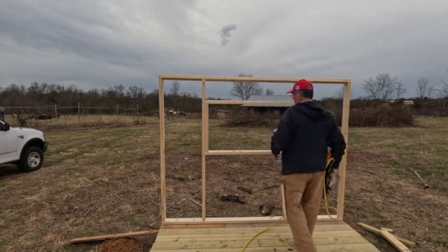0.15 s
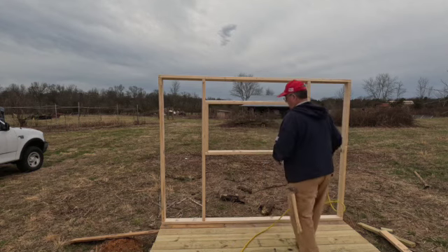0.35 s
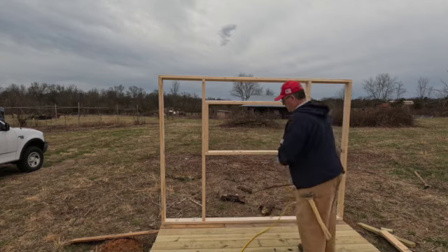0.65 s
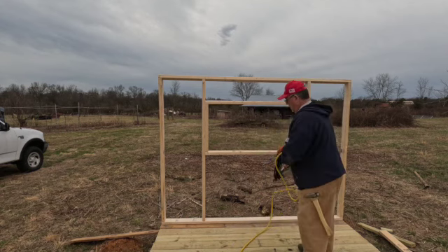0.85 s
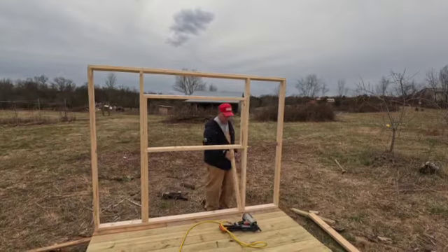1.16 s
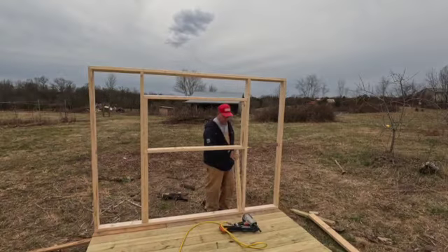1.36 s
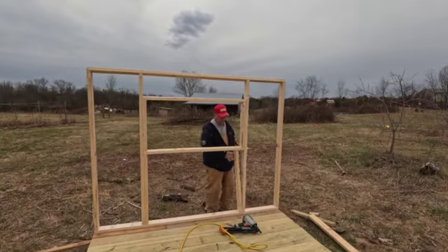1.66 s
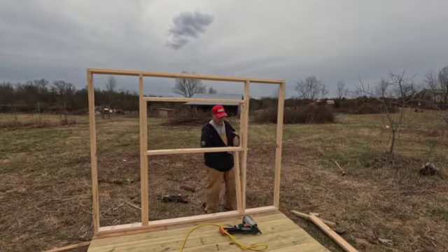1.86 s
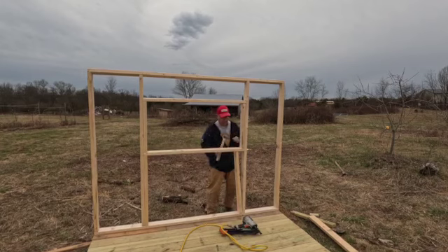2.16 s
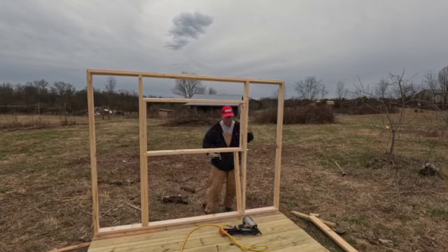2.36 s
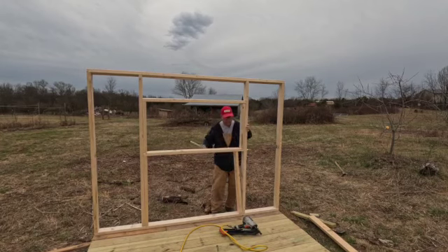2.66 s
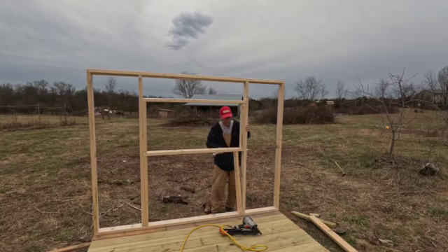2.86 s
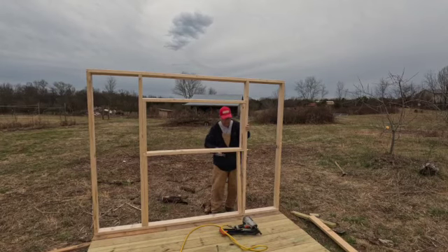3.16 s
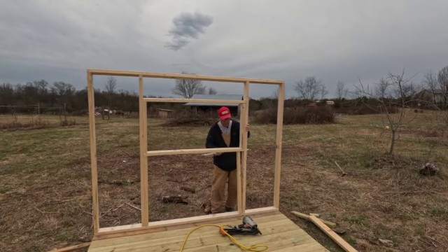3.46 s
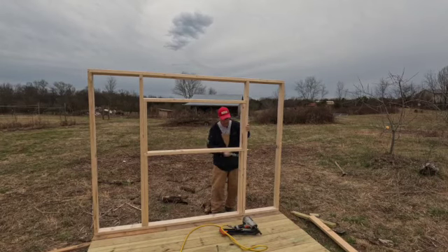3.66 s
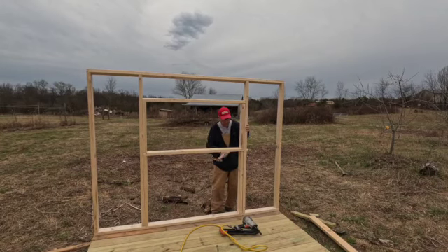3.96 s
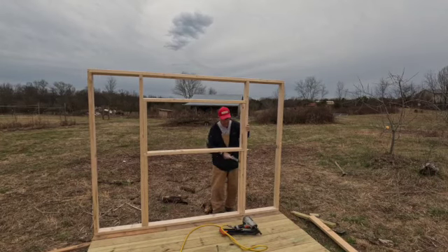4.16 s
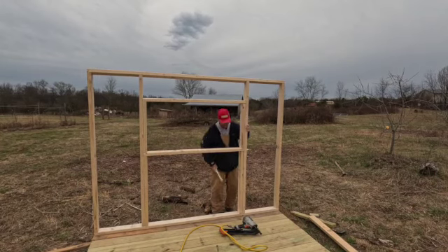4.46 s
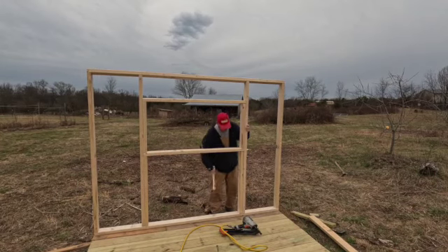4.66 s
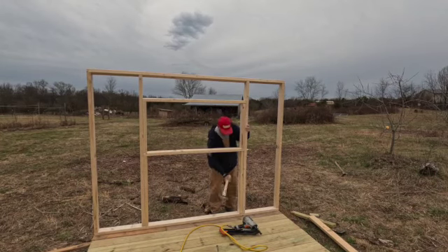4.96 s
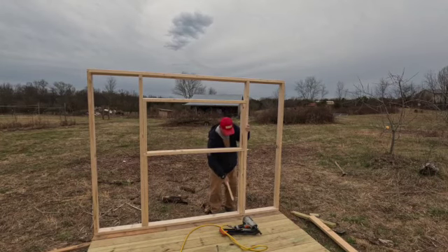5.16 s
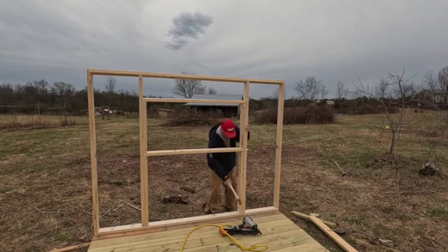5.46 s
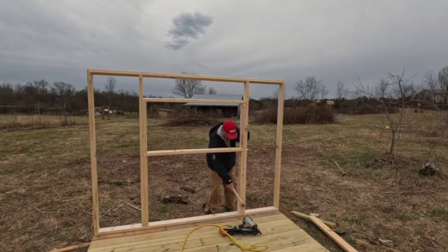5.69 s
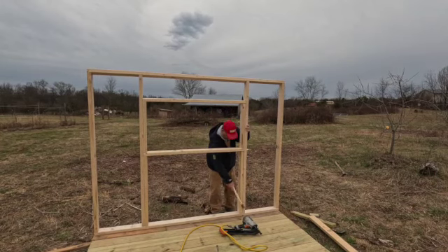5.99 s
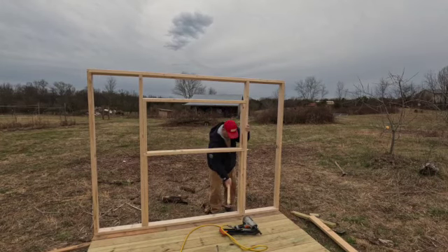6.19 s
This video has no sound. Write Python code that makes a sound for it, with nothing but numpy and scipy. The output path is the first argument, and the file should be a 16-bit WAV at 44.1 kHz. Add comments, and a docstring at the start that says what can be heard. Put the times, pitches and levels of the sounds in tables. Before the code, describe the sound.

A loud air compressor roars close by and cuts off abruptly, then quiet field wind, light wooden knocks and five hard hammer blows with outdoor echoes.

```python
"""A building site in an open field. A compressor (coloured noise, fuzzy lines, throbbing tone) roars
close by and is cut off. After a short near-silence the field fades in: low wind, far wash, hum and
rustling clothes, all shaped noise. Light knocks follow (noise taps, frame modes), before and among five
hard blows on a timber frame (noise cracks, ringing modes), each thrown back by a wall some 16 m away
and by the far tree line."""
import sys
import numpy as np
from scipy import signal
from scipy.io import wavfile
from scipy.ndimage import uniform_filter1d

SR = 44100
rng = np.random.default_rng(int(sys.argv[2]) if len(sys.argv) > 2 else 0)


def put_to_file(sound):
    """Save the sound as 16-bit audio at rate SR, in the file named by the first command-line argument."""
    columns = np.atleast_2d(sound).T  # one column per channel
    safe = np.clip(columns, -1, 1)
    whole_steps = np.round(safe * 32767)
    wavfile.write(sys.argv[1], SR, whole_steps.astype(np.int16))


N = 279153


def amp(db):
    """dB to amplitude factor."""
    return 10 ** (np.asarray(db) / 20)


def evened(x):
    """Scale to unit RMS."""
    return x / np.sqrt(np.mean(x ** 2) + 1e-20)


def read(points, hz):
    """Interpolate a (f, value) curve on a log frequency axis."""
    f, value = np.transpose(points)
    return np.interp(np.log(hz + 1), np.log(f + 1), value)


def curves(rows):
    """Interpolate each column of a (t, ...) table to sample rate."""
    s, *columns = np.transpose(rows)
    return [np.interp(np.arange(N) / SR, s, c) for c in columns]


def add(mix, s, sound):
    """Mix a sound in from time s, cut at the end of the mix."""
    part = mix[round(s * SR):][:len(sound)]
    part += sound[:len(part)]


def lumps(count, size, depth_db):
    """Gain that wanders at random, holding for about size samples."""
    wander = rng.standard_normal(count)
    for _ in range(2):
        wander = uniform_filter1d(wander, size=size)
    return amp(depth_db * evened(wander))


def noise(shape, patchy_db, flicker_db):
    """Unit-RMS noise: random short-time spectra, drifting patches, a flicker shared by all bins."""
    frames, hz = N // 256 + 5, np.fft.rfftfreq(1024, 1 / SR)
    real, imag, patches = rng.standard_normal((frames, 513, 3)).T
    patches = uniform_filter1d(patches, size=8, axis=0)  # across bins
    patches = evened(uniform_filter1d(patches, size=10, axis=1))  # across frames
    flicker = evened(uniform_filter1d(rng.standard_normal(frames), size=4))
    gain_db = read(shape, hz)[:, None] + patchy_db * patches + flicker_db * flicker
    spectra = (real + 1j * imag) * amp(gain_db)
    return evened(signal.istft(spectra, nperseg=1024, noverlap=768)[1][:N])


def whistle(hz, width_hz):
    """Fuzzy line: noise through a narrow double-pole resonance, shifted to hz, unit RMS."""
    r = np.exp(-np.pi * width_hz / SR)
    white = rng.standard_normal(N) + 1j * rng.standard_normal(N)
    slow = signal.lfilter([1], [1, -2 * r, r * r], white)
    return evened((slow * np.exp(2j * np.pi * hz * np.arange(N) / SR)).real)


def causal(db):
    """Minimum-phase impulse response with the given dB on 2049 bins, faded out."""
    mirrored = np.r_[db, db[-2:0:-1]]
    log_gain = np.log(amp(np.maximum(mirrored, -100)))
    response = np.fft.ifft(np.exp(np.conj(signal.hilbert(log_gain)))).real
    return response[:2048] * np.hanning(4096)[2048:]


def ring(modes, t, pitch, spread_db, rise_s, tilt_db=0):
    """Modes of a struck body, peak 1; each blow lands elsewhere, so mode strengths vary."""
    hz, db, t60 = np.transpose(modes)[:, :, None]
    db = db + spread_db * rng.standard_normal(db.shape) + tilt_db * np.log2(hz)
    partials = amp(db - 60 * t / t60) * np.sin(2 * np.pi * hz * pitch * t)
    wave = partials.sum(0) * (1 - np.exp(-t / rise_s))
    return wave / abs(wave).max()


def burst(t, t60, colour, rise_s):
    """Dying puff of noise through a colour, peak 4 ms RMS = 1."""
    puff = rng.standard_normal(len(t)) * amp(-60 * t / t60) * (1 - np.exp(-t / rise_s))
    wave = signal.oaconvolve(puff, colour)[:len(t)]
    return wave / np.sqrt(uniform_filter1d(wave ** 2, size=176).max())


def microphone_noise(level_db=-101):
    """Steady white noise floor."""
    return amp(level_db) * rng.standard_normal(N)


# breeze and cloth: t/s, breeze level/dB, rustle level/dB
FIELD_LEVELS = [(1.06, -54.5, -66), (1.2, -51.5, -64), (1.33, -50, -63), (1.7, -50.5, -62),
                (2.05, -47.5, -63.5), (2.35, -49.5, -61), (2.57, -48.5, -55), (2.9, -47.5, -61.5),
                (3.2, -55, -64), (3.8, -58, -68), (4.05, -57, -72.5), (4.3, -58.5, -59.5),
                (4.55, -60.5, -66.5), (4.75, -57.5, -66), (5.3, -57.5, -65), (5.7, -59, -71),
                (6.33, -55, -70)]
# spectra of low wind, far wash, cloth rustle: f/Hz, relative density/dB
WIND_SPECTRUM = [(15, -58), (25, -19.5), (91, -1.5), (118, 2.5), (194, -5), (253, -1.5), (317, -15.5),
                 (454, -25), (600, -29.5), (780, -52), (1320, -120)]
WASH_SPECTRUM = [(180, -25), (300, 1), (503, -4.5), (613, 0), (897, -8.5), (1150, -7), (1670, -17),
                 (2000, -22.5), (2600, -47.5), (4400, -120)]
RUSTLE_SPECTRUM = [(710, -33.5), (1200, -2), (2560, -4), (2770, -4.5), (4850, -16.5), (5680, -16.5),
                   (7150, -24), (8990, -37), (10500, -31), (13000, -43.5)]
RETURN_S, RETURN_RISE_S = 1.041, 0.051
STILL_DB = -57  # calm breeze, reference for wash and hum
WASH_DB, WASH_DB_PER_DB = -63, 0.75  # level in calm air, gain per dB of breeze
HUM_DB, HUM_DB_PER_DB = -71.5, 2
HUM_HZ, HUM_POLE_WIDTH_HZ, HUM_WAVER_DB = 121, 12, 4.0


def field():
    """Lumpy wind, far wash and hum carried by the breeze, grainy cloth rustle; all fade in."""
    breeze_db, rustle_db = curves(FIELD_LEVELS)
    rise_db = breeze_db - STILL_DB
    wind = amp(breeze_db) * noise(WIND_SPECTRUM, patchy_db=2.8, flicker_db=1.5)
    wash = amp(WASH_DB + WASH_DB_PER_DB * rise_db) * noise(WASH_SPECTRUM, patchy_db=1.5, flicker_db=1.2)
    rustle = amp(rustle_db) * noise(RUSTLE_SPECTRUM, patchy_db=1.6, flicker_db=1.3)
    hum = whistle(HUM_HZ, HUM_POLE_WIDTH_HZ) * lumps(N, size=3000, depth_db=HUM_WAVER_DB)
    hum = amp(HUM_DB + HUM_DB_PER_DB * rise_db) * hum
    fade_in = np.clip((np.arange(N) / SR - RETURN_S) / RETURN_RISE_S, 0, 1) ** 2
    return (wind + wash + rustle + hum) * fade_in


# spectra of rumble and air hiss: f/Hz, relative density/dB
RUMBLE_SPECTRUM = [(15, -46), (25, -39.5), (69, 4.5), (144, -2.5), (172, -10.5), (312, 2.5), (546, -10.5),
                   (687, -13), (1030, -20.5), (1180, -16.5), (1400, -24), (1570, -26.5), (2500, -30),
                   (3250, -54.5), (5500, -120)]
HISS_SPECTRUM = [(880, -22), (1500, -8), (1590, -4.5), (1690, -5), (2370, -5), (4080, -11), (7420, -33.5),
                 (8940, -46), (10100, -40.5), (14000, -76.5)]
# motor lines: f/Hz, pole width/Hz, level re rumble noise/dB
MOTOR_LINES = [(72, 11, -10), (141.4, 4.2, -12.5), (717, 14, -20.5), (792, 21, -19), (1570, 27, -26)]
CUT_S, CUT_T60_S = 0.96, 0.022
RUMBLE_DB, RUMBLE_CLIMB_DB_PER_S = -28.5, 2.5  # level at t = 0; the load grows
HISS_DB, HISS_CLIMB_DB_PER_S = -47.5, 4
PIP_HZ, PIP_DB, PIP_DIP_DB = 1172, -41, -15.5  # RMS level at throb crest, change in the dip
PIP_FIRST_S, PIP_EVERY_S = 0.18, 0.176


def compressor():
    """Rumble with fuzzy motor lines, air hiss and a throbbing thin tone, cut off sharply."""
    t = np.arange(N) / SR
    running = np.minimum(t, CUT_S)
    rumble = noise(RUMBLE_SPECTRUM, patchy_db=1.0, flicker_db=0.83)
    rumble = rumble + sum(amp(db) * whistle(hz, width) for hz, width, db in MOTOR_LINES)
    roar = amp(RUMBLE_DB + RUMBLE_CLIMB_DB_PER_S * running) * rumble
    hiss = noise(HISS_SPECTRUM, patchy_db=1.16, flicker_db=0.56)
    hiss = amp(HISS_DB + HISS_CLIMB_DB_PER_S * running) * hiss
    throb = abs(np.sin(np.pi * (t - PIP_FIRST_S) / PIP_EVERY_S))
    pip = amp(PIP_DB + PIP_DIP_DB * throb) * np.sqrt(2) * np.sin(2 * np.pi * PIP_HZ * t)
    after = np.maximum(t - CUT_S, 0)
    dying = amp(-60 * after / CUT_T60_S) + amp(-44.5 - 60 * after / 0.09)  # fast drop, faint tail
    return (roar + hiss + pip) * dying


# low modes of the timber frame: f/Hz before pitch factor, level before tilt/dB, t60/s
THUD_MODES = [(103.8, -21.5, 0.079), (181.3, -1.5, 0.15), (209.9, 3, 0.12), (266.8, 5, 0.077),
              (307.6, 0, 0.1), (450, -11.5, 0.024)]


def frame_thud(t, pitch, spread_db, rise_s, tilt_db):
    """Slow low modes of the frame, peak 1; tilt in dB per octave."""
    return ring(THUD_MODES, t, pitch, spread_db, rise_s, tilt_db)


# light knocks of tool and wood: t/s, tap level/dB, colour f/Hz, t60/s, thud level/dB
KNOCK_EVENTS = [(1.2852, -36.5, 2230, 0.061, -27), (1.2962, -37.5, 1730, 0.042, -21),
                (1.3709, -44, 1960, 0.056, -38), (1.4266, -25, 1920, 0.058, -42),
                (1.524, -54, 1790, 0.038, -58), (2.0752, -56.5, 2470, 0.043, -60),
                (2.1004, -69, 1940, 0.035, -40), (2.335, -53, 2010, 0.024, -58),
                (2.5242, -52, 1950, 0.035, -31.5), (3.226, -50, 2300, 0.018, -55),
                (3.2333, -41, 1800, 0.042, -44.5), (3.3876, -58, 1880, 0.026, -58),
                (3.4078, -52, 1770, 0.032, -56), (3.4269, -63, 1930, 0.022, -47.5),
                (4.58, -55, 1960, 0.031, -62)]


def knocks():
    """Short noise tap coloured around one frequency, plus a small thud of the frame."""
    out, t, hz = np.zeros(N), np.arange(SR // 4) / SR, np.fft.rfftfreq(4096, 1 / SR)
    for s, tap_db, colour_hz, t60_s, thud_db in KNOCK_EVENTS:
        octaves = np.log2((hz + 20) / colour_hz)
        hump_db = -4.0 * abs(octaves) - 5.7 * octaves ** 2
        peak_db = 7.7 * np.exp(-(octaves / 0.061) ** 2)
        colour = causal(hump_db + peak_db - (hz / 3500) ** 2)
        add(out, s, amp(tap_db) * burst(t, t60_s, colour, rise_s=0.00073))
        add(out, s, amp(thud_db) * frame_thud(t, 1.0, spread_db=0.98, rise_s=0.0024, tilt_db=9.8))
    return out


CRACK_T60_S, TREBLE_T60_S, TREBLE_HZ = 0.035, 0.014, 3470  # treble dies first


def crack(t, hz, octaves, colour_db, edge_db):
    """Noise burst split into body and faster-dying treble, plus a very short bright edge."""
    low = 1 / (1 + ((hz + 1) / TREBLE_HZ) ** 4)
    body = causal(colour_db + 20 * np.log10(low))
    treble = causal(colour_db + 20 * np.log10(1 - low))
    edge = causal(-10 * np.log10(1 + (6000 / (hz + 1)) ** 6) - 24.8 * octaves)
    treble_gain = np.linalg.norm(treble) / np.linalg.norm(body)
    sound = burst(t, CRACK_T60_S, body, rise_s=0.00014)
    sound = sound + treble_gain * burst(t, TREBLE_T60_S, treble, rise_s=0.0002)
    return sound + amp(edge_db) * burst(t, 0.004, edge, rise_s=0.0001)


# hammer-head resonances: f/Hz, width/Hz, level/dB
STEEL_MODES = [(1430, 140, -8), (2800, 120, 0), (3850, 160, -10)]


def steel_response(hz):
    """Sum of the hammer head's resonance peaks."""
    return sum(amp(db) / (1 + (2 * (hz - f) / width) ** 2) for f, width, db in STEEL_MODES)


WALL_S = 0.094  # echo delay
# steel singing on, direct and off the wall: delay/s, level before blow's crack and ring/dB, t60/s
SINGING_PATHS = [(0, -59.5, 0.18), (WALL_S, -53.5, .28)]


def steel_singing(out, s, t, hz, level_db):
    """Long narrow-band tail of the steel, direct and again off the wall."""
    skirt_db = -8.0 * abs(np.log2((hz + 50) / 2800))
    colour = causal(26 * np.log10(steel_response(hz)) + skirt_db)
    for delay, db, t60_s in SINGING_PATHS:
        add(out, s + delay, amp(level_db + db) * burst(t, t60_s, colour, rise_s=0.0027))


# far reflectors: delay/s, level before blow's far level/dB, rise/s, t60/s
FAR_REFLECTORS = [(.13, -2.5, 0.026, 0.34), (.27, -9, 0.037, 0.36), (.39, -10.5, .03, .5)]
ECHO_TILT_DB_PER_OCTAVE = -1.3


def echoes(out, s, t, octaves, ringing_db, wall_level_db, far_level_db):
    """Wall echo, sharp with a longer tail; then slow, lumpy, duller returns from far off."""
    ringing = causal(ringing_db)
    wall = burst(t, 0.021, ringing, rise_s=0.00075) + 0.5 * burst(t, 0.21, ringing, rise_s=0.00083)
    add(out, s + WALL_S, amp(wall_level_db) * wall)
    dull = causal(ringing_db + ECHO_TILT_DB_PER_OCTAVE * np.minimum(octaves, 2))
    for delay, db, rise_s, t60_s in FAR_REFLECTORS:
        echo = burst(t, t60_s, dull, rise_s) * lumps(len(t), size=300, depth_db=2.5)
        add(out, s + delay, amp(far_level_db + db) * echo)


AHEAD_S, AHEAD_DB, AHEAD_STEP_DB = 0.0107, -8.5, -12.5
AHEAD_DB_PER_DB = 0.46  # per dB of wall echo re crack


def ticks_ahead(out, s, t, ringing, crack_db, wall_db):
    """Four faint ticks before the crack in even steps, weaker the earlier."""
    for step in range(1, 5):
        tick_db = crack_db + AHEAD_DB + AHEAD_DB_PER_DB * wall_db + AHEAD_STEP_DB * (step - 1)
        add(out, s - step * AHEAD_S, amp(tick_db) * burst(t, 0.06, ringing, rise_s=0.0008))


# blows: t/s, crack level/dB, crack tilt/dB per octave, thud level/dB, thud pitch factor,
# thud tilt/dB per octave, boom t60/s, then re crack: bright edge/dB, timber/dB,
# steel ring/dB (gain of the resonances in the tail colour), wall echo/dB, far echoes/dB
BLOW_EVENTS = [(2.9677, -4.5, -0.45, -14.5, 0.96, 3, 0.34, -35, -9.5, -6, -23.5, -41),
               (3.6058, -5, 0.1, -14.5, 0.94, 12.5, 0.38, -43.5, -6, 7.5, -21.5, -39.5),
               (4.1053, -5, 5, -16, 1, -1.3, 0.49, -15.5, -18.5, 5.5, -30.5, -40),
               (5.092, -5, 2, -9.5, 1, 1.5, 0.37, -22.5, -9, -1.5, -27.5, -44),
               (5.7679, -15.5, 1.2, -6, 1.053, 2.1, 0.32, -49.5, .4, -10, -36.5, -53)]
# crack spectrum: f/Hz, level before tilt/dB
CRACK_SPECTRUM = [(240, -18), (400, -0.5), (730, -8), (962, -2.5), (1380, 0.5), (2690, -6.5), (3090, -10.5),
                  (3770, -15), (4440, -21), (5220, -25.5), (6710, -36), (8000, -54), (10400, -57),
                  (17600, -120)]
# ringing timber: f/Hz before pitch factor, level/dB, t60/s
TIMBER_MODES = [(530.5, -4, 0.09), (720, -2.5, 0.18), (750, -8, 0.079), (963.6, 2.5, 0.11),
                (1115, -7.5, 0.049), (1265, -1.5, .08), (1600, 3, 0.021), (1660, -4, 0.11),
                (1944, 0.5, 0.097), (2075, 0, 0.093), (2610, -7.5, 0.063), (3770, -11.5, .05)]
# deck under the frame: f/Hz, relative level/dB
BOOM_SPECTRUM = [(50, -60), (90, -10), (160, 0), (250, 0.5), (350, -8), (600, -22.5), (1200, -41),
                 (3000, -100)]
REBOUND_S, REBOUND_DB, REBOUND_DB_PER_DB = 0.033, -28, 0.98  # re crack; gain per dB of timber


def blows():
    """Crack with ground bounce, ringing timber, slow thud and boom, rebound, steel, echoes, ticks."""
    out, t, hz = np.zeros(N), np.arange(SR * 3 // 4) / SR, np.fft.rfftfreq(4096, 1 / SR)
    octaves, boom = np.log2((hz + 50) / 1500), causal(read(BOOM_SPECTRUM, hz))
    for (s, crack_db, tilt_db, thud_db, pitch, thud_tilt_db, boom_t60_s,
         edge_db, timber_db, steel_db, wall_db, far_db) in BLOW_EVENTS:
        colour_db = read(CRACK_SPECTRUM, hz) + tilt_db * octaves
        # the hammer head sings on in the tail
        ringing_db = colour_db + 20 * np.log10(1 + amp(steel_db) * steel_response(hz))
        ringing = causal(ringing_db)
        blow = crack(t, hz, octaves, colour_db, edge_db)
        add(out, s, amp(crack_db) * blow)
        add(out, s + 0.0027, amp(crack_db - 17.0) * blow)  # ground bounce
        add(out, s, amp(crack_db - 26.5) * burst(t, 0.2, ringing, rise_s=0.00039))
        timber = ring(TIMBER_MODES, t, pitch=0.99, spread_db=1.4, rise_s=0.0002)
        add(out, s, amp(crack_db + timber_db) * timber)
        thud = frame_thud(t, pitch, spread_db=0.91, rise_s=0.016, tilt_db=thud_tilt_db)
        add(out, s, amp(thud_db) * thud)
        add(out, s, amp(thud_db - 6.5) * burst(t, boom_t60_s, boom, rise_s=0.0046))
        rebound_db = crack_db + REBOUND_DB + REBOUND_DB_PER_DB * timber_db
        add(out, s + REBOUND_S, amp(rebound_db) * burst(t, 0.082, ringing, rise_s=0.0037))
        steel_singing(out, s, t, hz, crack_db + 2 * steel_db)
        echoes(out, s, t, octaves, ringing_db, crack_db + wall_db, crack_db + far_db)
        ticks_ahead(out, s, t, ringing, crack_db, wall_db)
    return out


def scene():
    """Sum of all sources, one channel."""
    return (microphone_noise() + field() + compressor() + knocks() + blows())[None]


EDGE_HZ = 16300


def record(dry):
    """Input clips at +-0.9; the microphone drops the deep bass; then the band limit."""
    clipped = np.clip(dry, -0.9, 0.9)
    thinned = signal.sosfilt(signal.butter(2, 48, "high", fs=SR, output="sos"), clipped)
    band_limit = signal.firwin(511, EDGE_HZ, window=("kaiser", 9), fs=SR)
    return signal.oaconvolve(thinned, band_limit[None], "same")


dry = scene()
out = record(dry)
put_to_file(out)
```